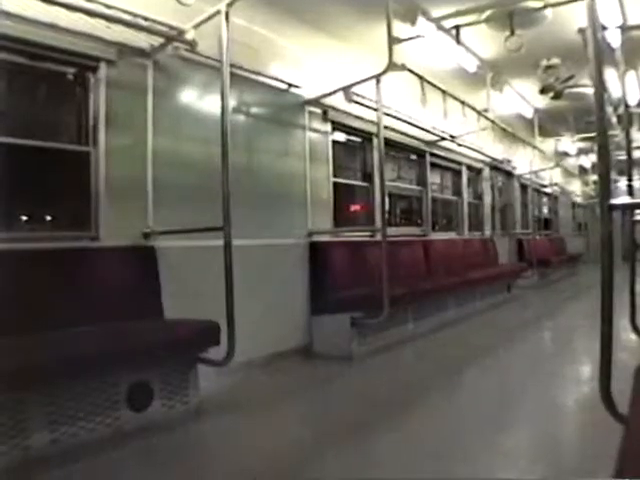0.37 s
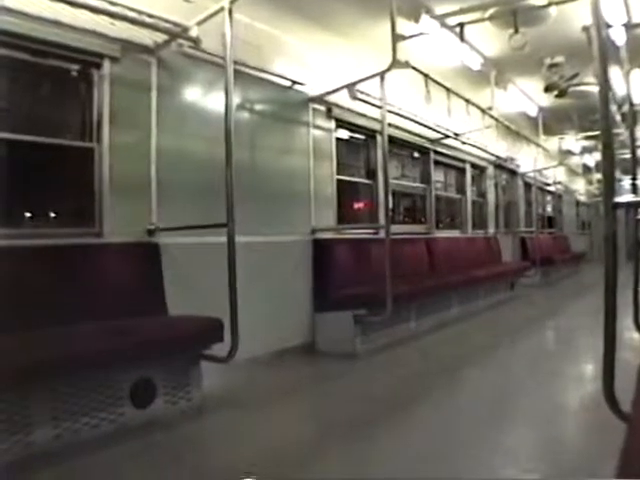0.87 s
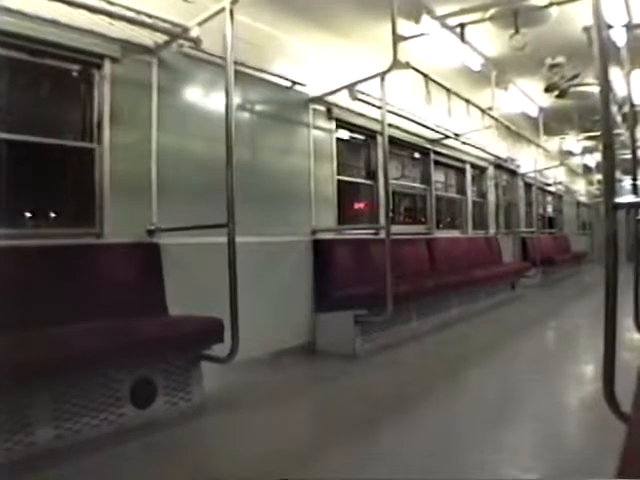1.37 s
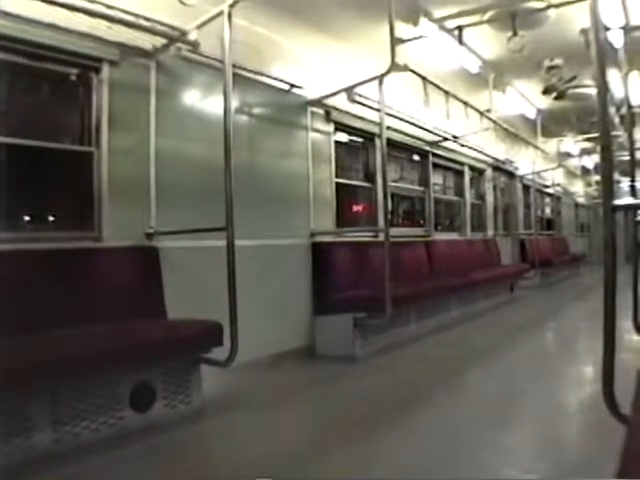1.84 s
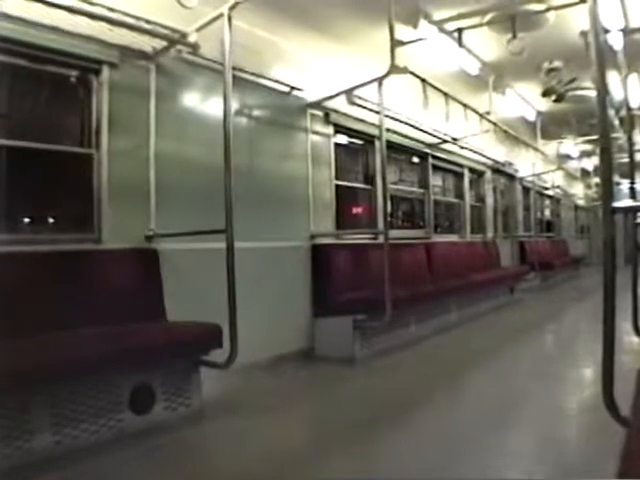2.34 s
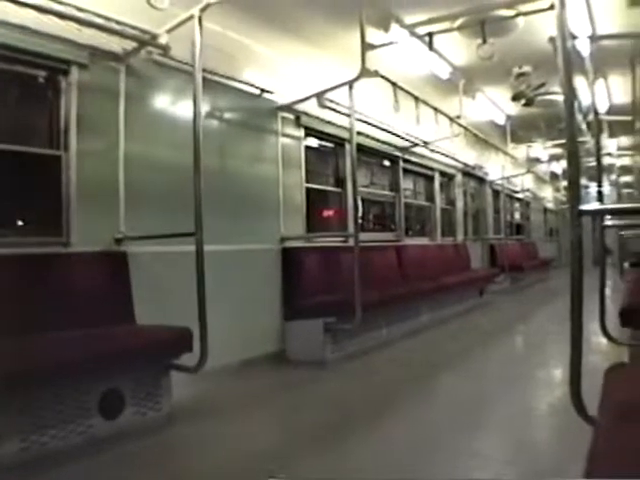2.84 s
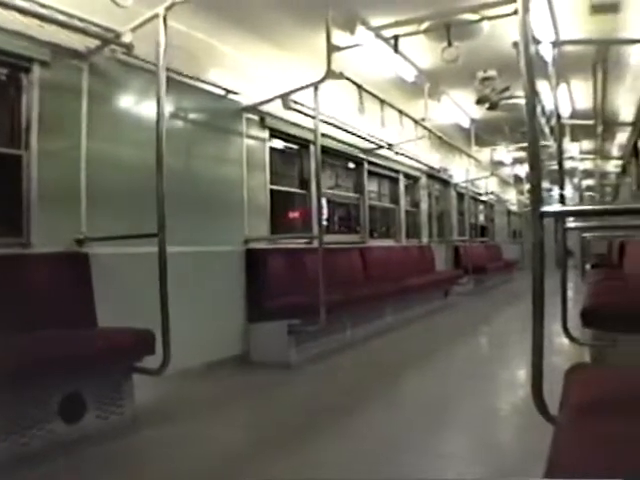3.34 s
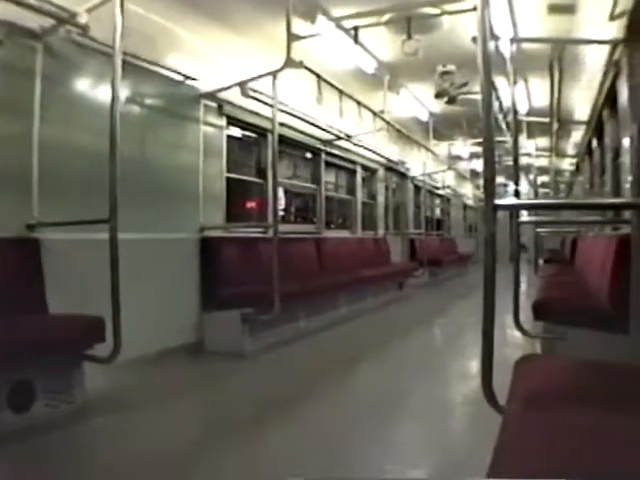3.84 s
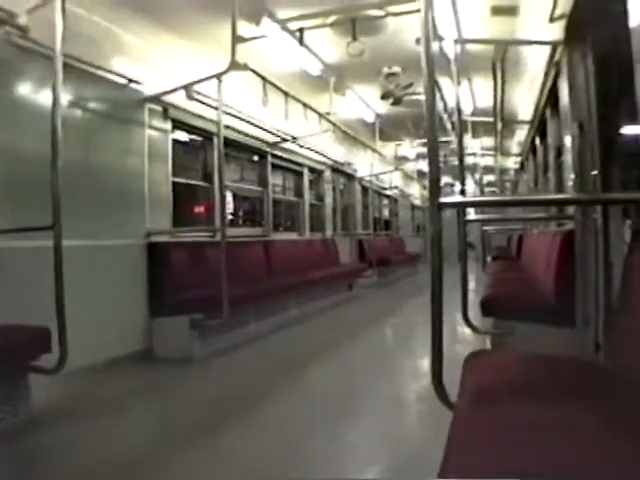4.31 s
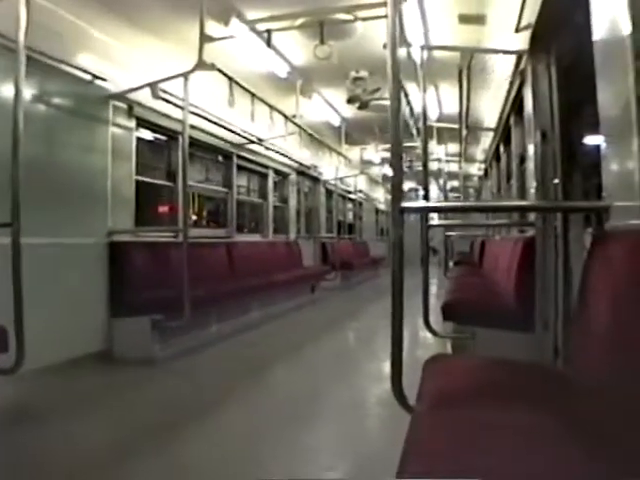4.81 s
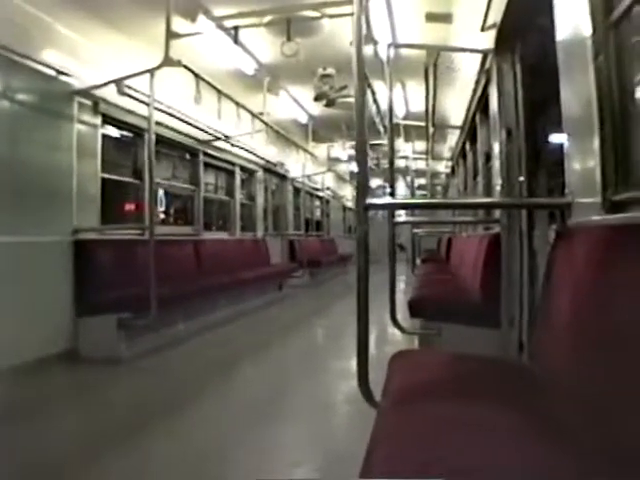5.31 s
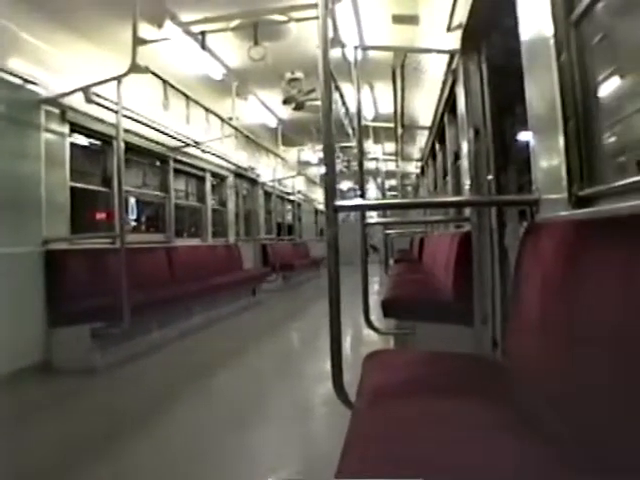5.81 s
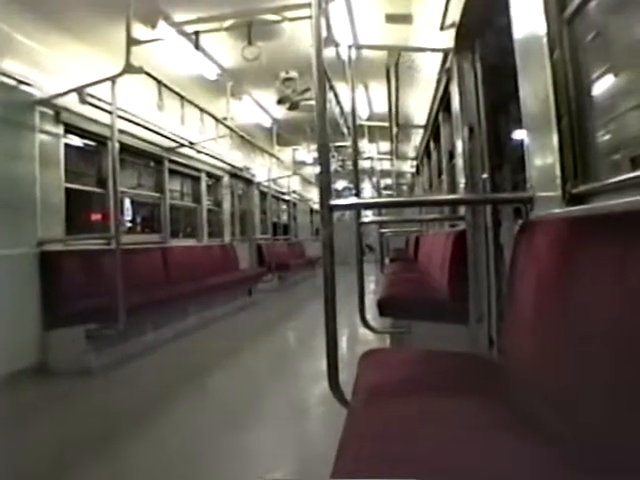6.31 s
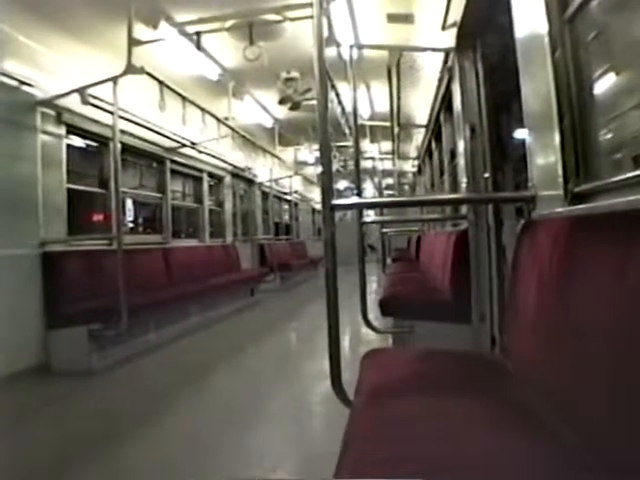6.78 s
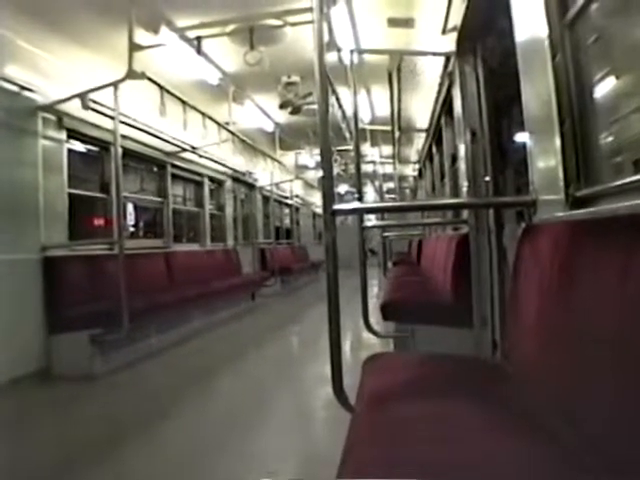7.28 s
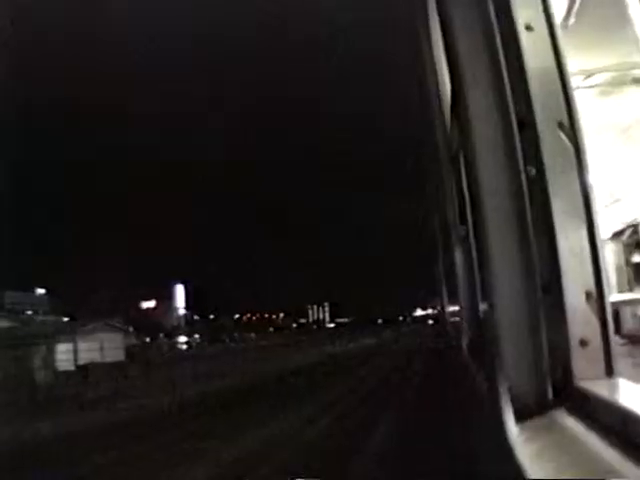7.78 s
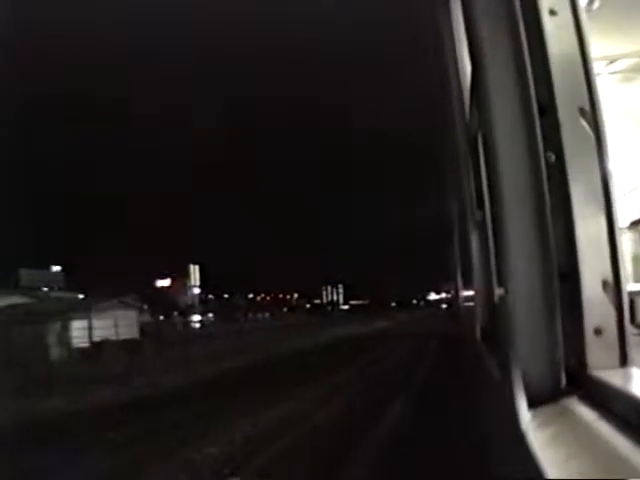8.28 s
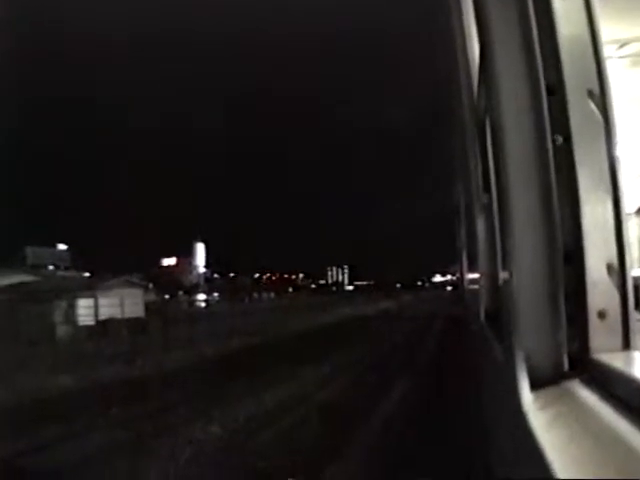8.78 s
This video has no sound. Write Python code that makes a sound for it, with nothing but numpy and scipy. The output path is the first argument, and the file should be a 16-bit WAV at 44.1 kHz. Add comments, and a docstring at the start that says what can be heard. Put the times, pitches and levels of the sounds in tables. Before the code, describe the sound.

An underfloor diesel hums low and almost constant, its pitch hunting slightly, surrounded by muffled rumble, ventilation-like roar and faintly buzzing metal panels. A brief rattle comes at the very start and an almost inaudible fluttering high chirp persists. Then the sound cuts abruptly to an open window, with less deep hum, a slow swelling beat, a clearer higher engine tone, thin short squeaks and one faint late tick. A handheld microphone in a hard, empty car.

```python
"""A diesel engine under the floor of an empty railcar, a sum of shaft orders, hunts a little in speed.
Around it: shaped noise for rumble and roar, steady machine tones, resonant noise for buzzing panels.
A gated high chirp runs throughout; a dry rattle opens the scene and a faint tick comes late.
Then the listener is suddenly at an open window: the deep order weakens and beats, a higher one sings
and a pane squeaks in its frame."""
import sys
import numpy as np
from scipy import signal
from scipy.fft import rfft, irfft, next_fast_len
from scipy.io import wavfile
from scipy.ndimage import uniform_filter1d, map_coordinates

SR = 44100
rng = np.random.default_rng(int(sys.argv[2]) if len(sys.argv) > 2 else 0)


def materialize(psi):
    """Save the field psi as 16-bit PCM at rate SR to the path in sys.argv[1].

    A 1-D psi becomes a single channel; in a 2-D psi each row is a channel.
    """
    bounded = np.clip(np.atleast_2d(psi).T, -1, 1)
    quanta = np.round(bounded * 32767).astype(np.int16)
    wavfile.write(sys.argv[1], SR, quanta)


def level_to_linear(level):
    """Convert decibel levels to linear amplitude factors, elementwise."""
    exponent = np.asarray(level, float) / 20
    return 10 ** exponent


N = 403074
TIME = np.arange(N) / SR  # s
MOVE_S = 7.62  # jump from saloon to window
FLICKER_HZ = 20.4  # repeat rate of chirp and rattle
PULSE_PHASE_RAD = 2.3  # common to all orders
BOOM_LAG_RAD = 1.85  # second order, on a body resonance, at 28 turns/s


def unit(x):
    """Scales x to rms 1."""
    return x / np.sqrt(np.mean(x ** 2) + 1e-20)


def wobble(rate_hz):
    """Smooth random curve through rate_hz normal knots a second."""
    knots = rng.standard_normal(int(N * rate_hz / SR) + 4)
    return map_coordinates(knots, [TIME * rate_hz])


def filtered(x, response):
    """Multiplies the spectrum of x by response(Hz)."""
    size = next_fast_len(N + SR // 4)
    hz = np.fft.rfftfreq(size, 1 / SR)
    return irfft(rfft(x, size) * response(hz), size)[:N]


def shaft(speed):
    """Turns per second and angle in radians of the engine shaft: the angle integrates the speed."""
    turns = np.interp(TIME, *np.transpose(speed))
    return turns, 2 * np.pi * np.cumsum(turns) / SR


def hiss(spectrum, patchy_db):
    """Turbulent noise of the given density, with time-frequency patches of random gain."""
    z = signal.stft(rng.standard_normal(N), nperseg=512)[2]
    field = uniform_filter1d(rng.standard_normal(z.shape), size=6, axis=0)
    field = uniform_filter1d(field, size=6, axis=1)
    patchy = signal.istft(z * level_to_linear(patchy_db * unit(field)), nperseg=512)[1][:N]
    hz, db = np.transpose(spectrum)
    shaped = filtered(unit(patchy), lambda f: level_to_linear(np.interp(np.log(f + 1), np.log(hz), db)))
    return np.sqrt(SR / 2) * shaped


def clatter(speed):
    """Gain of rms 1 by which the roar pulses a little with the firing, three times a turn."""
    return unit(level_to_linear(.2 * np.cos(3 * shaft(speed)[1])))


def machines(tones):
    """Auxiliary machines: slightly unsteady tones that beat against the engine."""
    out = np.zeros(N)
    for hz, db in tones:
        level = level_to_linear(db + 0.43 * wobble(1.54))
        out += np.sqrt(2) * level * np.sin(2 * np.pi * hz * TIME + rng.uniform(0, 2 * np.pi))
    return out


def narrow(hz, width_hz):
    """Noise of rms 1 through two equal resonances in series."""
    ring = lambda f: (1j * f * width_hz / (hz * hz - f * f + 1j * f * width_hz)) ** 2
    return unit(filtered(rng.standard_normal(N), ring))


def buzz(modes, flutter_db):
    """Shaken panels and frames: each resonance buzzes in its own fits and starts."""
    out = np.zeros(N)
    for hz, width_hz, db in modes:
        flutter = level_to_linear(flutter_db * (0.39 * wobble(3.0) + wobble(24)))
        out += level_to_linear(db) * unit(flutter * narrow(hz, width_hz))
    return out


def chirp(rate_hz, sharp, between):
    """A wavering thin tone that flares briefly once a period and lingers faintly between."""
    # Each row: time in seconds, pitch in Hz, level in dB rms; pitch and level waver about these.
    track = [(.9, 11400, -83), (1.3, 11000, -88), (2.8, 10850, -85), (3.2, 11000, -92), (4.1, 11300, -88),
             (4.25, 11600, -79), (5.2, 11500, -82), (5.6, 11700, -82), (6.5, 11700, -82),
             (6.65, 11720, -79.5), (7.6, 11750, -79), (7.64, 11250, -87), (8.7, 11350, -86),
             (9.14, 11500, -82)]
    s, hz, db = np.transpose(track)
    pitch_hz = np.interp(TIME, s, hz) + 95 * wobble(200)
    tone = np.sin(2 * np.pi * np.cumsum(pitch_hz) / SR)
    gate = between + np.exp(sharp * (np.cos(2 * np.pi * rate_hz * (TIME - .021)) - 1))
    return level_to_linear(np.interp(TIME, s, db) + 2.2 * wobble(25)) * unit(gate * tone)


def rattle(count=7):
    """Short dry rattle: bright noise bursts, quick to rise, falling 60 dB in 0.21 s, loudest mid-way."""
    from_s, loudest_s = 0.0084, 0.13
    envelope_db, fade_db_per_s = -37.5, 34  # before the noise gains; fade to either side of loudest_s
    shape = np.zeros(N)
    jitter = rng.uniform(-.12, .12, count)  # periods
    for s in from_s + (np.arange(count) + jitter) / FLICKER_HZ:
        age = np.clip(TIME - s, 0, None)
        db = envelope_db - fade_db_per_s * abs(s - loudest_s)
        shape += level_to_linear(db - 60 * age / 0.21) * (1 - np.exp(-age / 0.0017))
    return shape * (0.29 * narrow(3100, 1600) + 0.24 * narrow(5300, 2500))


def ticks():
    """Loose fittings: short puffs of noise around each one's pitch."""
    # Each row: start in seconds, envelope level in dB ahead of the soft rise, pitch in Hz.
    fittings = [(8.69, -49, 3800)]
    out = np.zeros(N)
    for s, db, hz in fittings:
        age = np.clip(TIME - s, 0, None)
        out += level_to_linear(db - 60 * age / .08) * (1 - np.exp(-age / .001)) * narrow(hz, hz / 2)
    return out


def squeaks():
    """Squeaks and one thin whistle, as of a pane rubbing in its frame; shorter is more ragged in pitch."""
    # Each row: middle in seconds, level in dB rms, about which it wavers.
    short_rubs = [(7.64, -61), (7.8, -62), (7.98, -61), (8.08, -61), (8.18, -62), (8.26, -59), (8.39, -56),
                  (8.55, -60), (8.7, -61), (8.85, -59.5), (9.0, -58)]
    # middle s, half length s, pitch Hz, dB rms
    rubs = [(s, .023, 3280, db) for s, db in short_rubs]
    rubs.append((7.82, .15, 4660, -66.5))  # whistle
    out = np.zeros(N)
    for s, half_s, hz, db in rubs:
        tone = np.sqrt(2) * np.sin(2 * np.pi * hz * TIME + 0.03 / half_s * wobble(150))
        out += level_to_linear(db) * np.exp(-((TIME - s) / half_s) ** 4) * tone * level_to_linear(2.2 * wobble(40))
    return out


def throb(speed):
    """The second order and a steady machine tone just below it beat, swelling and sinking together."""
    order_db, partner_db = -36.5, -46  # rms; the order wavers about its level
    partner_hz, in_step_s = 53.2, 8.385  # phases agree at in_step_s
    order = 2 * shaft(speed)[1] + PULSE_PHASE_RAD - BOOM_LAG_RAD
    partner = 2 * np.pi * partner_hz * (TIME - in_step_s) + np.interp(in_step_s, TIME, order)
    second = level_to_linear(order_db + .8 * wobble(3.3)) * np.cos(order)
    return np.sqrt(2) * (second + level_to_linear(partner_db) * np.cos(partner))


def engine(speed, orders, sway_db, scatter_rad):
    """Orders locked to the shaft; standing waves lift some and sink others as the speed hunts."""
    turns, angle = shaft(speed)
    extra = turns - 28
    out = np.zeros(N)
    for k, db, slope, drift in orders:
        # higher orders are less steady and fall further out of step
        sway = sway_db * np.sqrt(k) * wobble(4) + drift * (TIME - MOVE_S / 2)
        boom_lag = (BOOM_LAG_RAD + 2.1 * extra) * (k == 2)
        lag = boom_lag + rng.normal(0, scatter_rad) * (k - 2)
        out += level_to_linear(db + slope * extra + sway) * np.cos(k * angle + PULSE_PHASE_RAD - lag)
    return np.sqrt(2) * out


def saloon():
    """Inside the car, above the engine: drone, rumble, roar and buzz add up."""
    # Each row: time in seconds, shaft turns per second.
    speed = [(0.0, 28.1), (1.6, 28.09), (2.2, 27.97), (2.81, 27.91), (3.61, 28.16), (4.01, 28.17),
             (4.5, 28.02), (5.21, 27.98), (5.61, 28.23), (6.02, 28.22), (6.82, 27.79), (7.22, 27.92),
             (7.62, 28.0)]
    # Engine orders. Each row: multiple of shaft speed, dB rms at 28 turns/s and MOVE_S / 2 before sway,
    # dB per extra turn/s, dB per second as the listener turns in the standing waves.
    orders = [(1, -55.1, 0, 0), (2, -27.9, -3, 0), (3, -39.3, -12, 0), (4, -52, -24, .4),
              (5, -53.5, -26, .8), (6, -39.6, 2, .1), (7, -51, 8, 0), (8, -46.8, 0, -.2),
              (9, -52.3, 0, -.4), (10, -51.5, 32, .2), (11, -47.3, -30, -.6), (12, -55, 0, -.3),
              (13, -59, 0, 0), (16, -59.0, 0, -.6), (17, -57.7, 0, 0)]
    # Auxiliary machines. Each row: pitch in Hz, level in dB rms, about which it wavers.
    tones = [(26.58, -48.1), (53.08, -52.9), (76.29, -54.6), (89.58, -50.3), (148.04, -52.5),
             (212.98, -56.1), (245.44, -53.4)]
    # Rumble of the car body. Each row: frequency in Hz, density in dB per Hz.
    rumble = [(15, -95), (24, -82), (40, -73), (62, -63.5), (72, -62), (100, -70), (126, -72.5), (150, -66),
              (185, -64.8), (225, -63.5), (270, -67.5), (340, -70.5), (420, -82.5), (700, -140)]
    # Engine roar, cooling air and microphone hiss. Each row: frequency in Hz, density in dB per Hz.
    roar = [(150, -120), (380, -73), (560, -68), (920, -72), (1200, -73), (1800, -77.5), (2500, -83),
            (3600, -89), (5400, -94), (6400, -91.5), (7600, -96), (8700, -104), (10200, -107.7),
            (15500, -109)]
    # Buzzing panels and frames. Each row: pitch in Hz, width in Hz, level in dB rms.
    modes = [(448, 56, -58.5), (1086.4, 71, -52), (1740, 190, -59.5)]
    noise = hiss(rumble, patchy_db=1.2) + clatter(speed) * hiss(roar, patchy_db=0.73)
    drone = engine(speed, orders, sway_db=0.3, scatter_rad=.09) + machines(tones)
    return drone + noise + buzz(modes, flutter_db=2.5)


def window():
    """At the open window: the same layers at other levels, with the beating second order and squeaks."""
    # Each row: time in seconds, shaft turns per second.
    speed = [(7.64, 28.3), (7.828, 28.1), (7.998, 27.8), (8.484, 28.0), (8.584, 28.1), (9.052, 28.3),
             (9.14, 28.4)]
    # Engine orders but the second. Each row: multiple of shaft speed, dB rms at 28 turns/s before sway,
    # dB per extra turn/s, dB per second of drift.
    orders = [(1, -56, 0, 0), (3, -37.3, 0, 0), (4, -45.5, -2, 0), (5, -48.5, 6, 0), (6, -44.5, -1, 0),
              (7, -56, -4, 0), (8, -50.5, -6, 0), (9, -59, 0, 0), (10, -41, 6, 0), (11, -49, 0, 0),
              (12, -56, 0, 0), (16, -53.5, 6, 0), (17, -55, 0, 0), (19, -56, 0, 0), (23, -52, -3, 0)]
    # Auxiliary machines. Each row: pitch in Hz, level in dB rms, about which it wavers.
    tones = [(68.5, -55), (76.3, -52), (89.6, -54), (198.5, -56)]
    # Rumble of the car body. Each row: frequency in Hz, density in dB per Hz.
    rumble = [(15, -100), (24, -85), (40, -77), (60, -70), (74, -61), (98, -65), (126, -68), (154, -68),
              (200, -66), (250, -64.5), (300, -66.5), (380, -70.5), (700, -140)]
    # Engine roar, cooling air and microphone hiss. Each row: frequency in Hz, density in dB per Hz.
    roar = [(150, -120), (380, -68.5), (560, -68), (800, -69.5), (1300, -74), (2000, -81), (2600, -85.5),
            (3700, -90.5), (5300, -93.5), (6300, -90.5), (7400, -97), (8800, -105), (10200, -108),
            (15500, -111)]
    # Buzzing panels and frames. Each row: pitch in Hz, width in Hz, level in dB rms.
    modes = [(520, 90, -53), (650, 60, -55), (1120, 100, -57), (5900, 300, -66), (6400, 500, -66),
             (3270, 250, -68), (6150, 90, -70)]
    noise = hiss(rumble, patchy_db=1.5) + clatter(speed) * hiss(roar, patchy_db=0.7)
    drone = engine(speed, orders, sway_db=0.33, scatter_rad=.15) + throb(speed) + machines(tones)
    return drone + noise + buzz(modes, flutter_db=2.8) + squeaks()


def scene():
    """The hard jump between the places leaves a step in the wave, heard as a tick."""
    after_s = TIME - MOVE_S
    step = -.045 * (after_s >= 0) * np.exp(-np.abs(after_s) / .003)
    fade = np.clip(after_s / 0.0044 + .5, 0, 1)
    places = (1 - fade) * saloon() + fade * window()
    high = chirp(rate_hz=FLICKER_HZ, sharp=3, between=.45)
    return (places + step + high + rattle() + ticks())[None]


def low_pass(x):
    """Removes everything above the highest recorded frequency."""
    return signal.sosfilt(signal.butter(12, 15530, fs=SR, output="sos"), x)


def record(dry):
    """Hands on the finished mix."""
    return low_pass(dry)


dry = scene()
out = record(dry)
materialize(out)
```